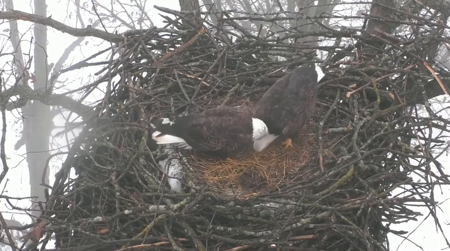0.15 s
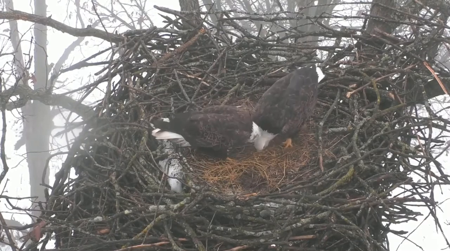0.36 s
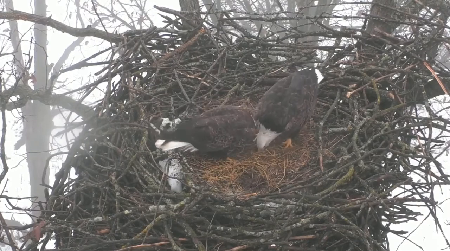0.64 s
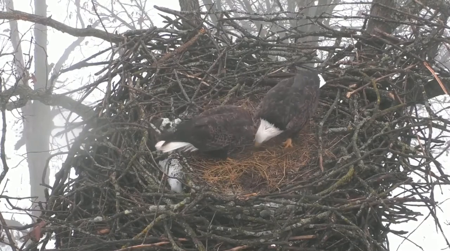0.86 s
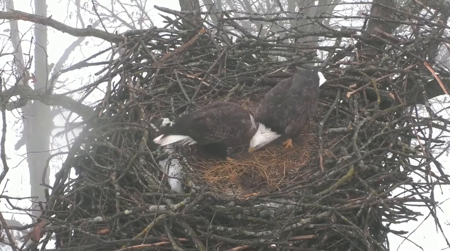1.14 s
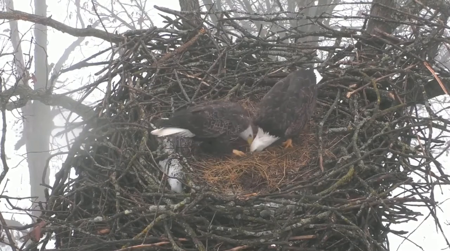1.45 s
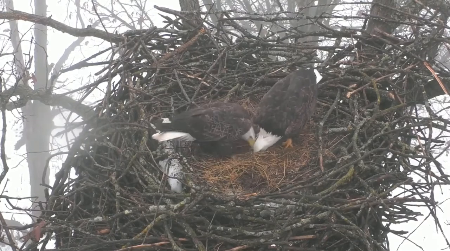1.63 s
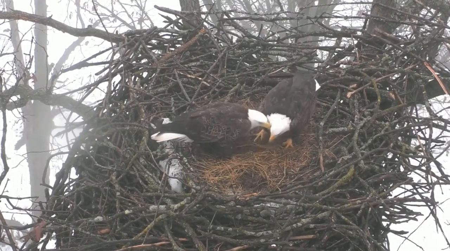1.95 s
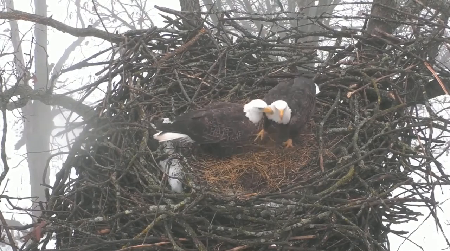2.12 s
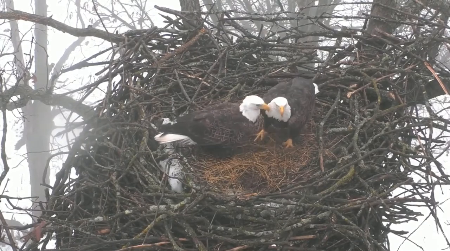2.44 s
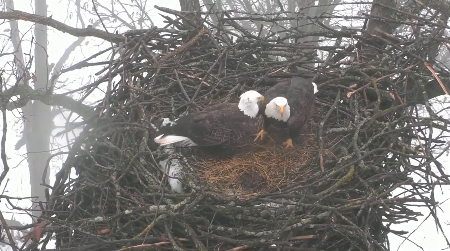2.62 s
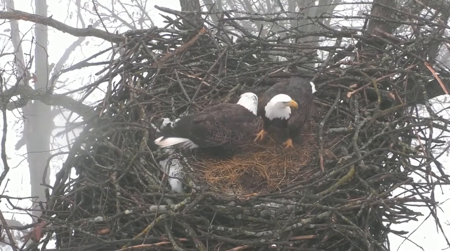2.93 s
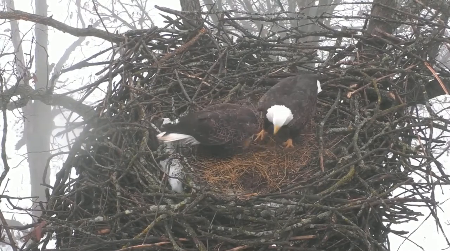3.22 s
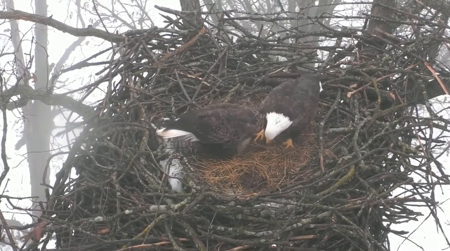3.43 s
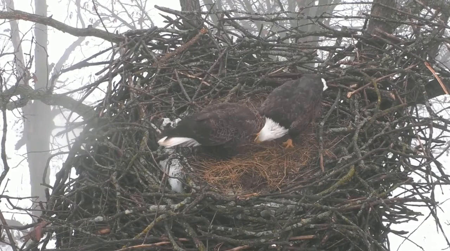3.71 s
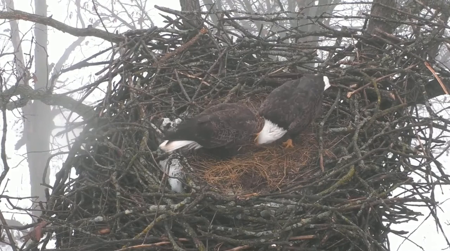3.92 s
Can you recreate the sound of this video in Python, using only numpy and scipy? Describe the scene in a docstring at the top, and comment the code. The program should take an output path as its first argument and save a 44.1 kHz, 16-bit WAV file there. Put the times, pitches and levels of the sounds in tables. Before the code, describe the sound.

A large bird of prey gives two hoarse rising notes, then a steady run of short raspy high chirps, echoing in windy bare woods.

```python
"""A bald eagle at its nest pipes two slow upward slurs, then a run of short, raspy, arching chirps.
Its notes are wavering sines with coloured noise as rasp, and they echo among bare trees.
Small birds whistle faintly at the start (gliding sines), and a distant bird gives one hoarse note near the end.
Wind rumbles on the microphone over the far hush of the woods (shaped noise),
and the nest camera's electronics add a thin high whine and a faint hiss."""
import sys
import numpy as np
from scipy import signal
from scipy.fft import rfft, irfft
from scipy.io import wavfile

SR = 44100
rng = np.random.default_rng(int(sys.argv[2]) if len(sys.argv) > 2 else 0)


def wrap_up_sound(samples):
    """Save the sound to the file named by the first command line argument, as 16-bit audio."""
    columns = np.atleast_2d(samples).T
    # keep every value between -1 and 1, then stretch to whole-number steps
    tamed = np.clip(columns, -1, 1)
    steps = np.round(tamed * 32767).astype(np.int16)
    wavfile.write(sys.argv[1], SR, steps)


N = 179531
T = np.arange(N) / SR  # time in seconds

# Noise colours, each only a shape, since the noise is levelled afterwards: pitch_hz, level_db
# the camera's hiss
HISS_COLOUR = [(1500, 2), (4100, 8.5), (5000, -1), (7000, 1.5), (11000, 5.5), (16000, -5.5)]
# the far hush of the woods: pitch_hz, level_db
WOODS_COLOUR = [(100, -6.5), (380, 2.5), (600, -4), (780, 0.5), (950, 4), (1200, -4.5), (1600, -11),
                (1900, -14), (2250, -5.5), (2700, -1.5), (3400, -8), (3900, -13.5), (4500, -39)]
# wind on the microphone: pitch_hz, level_db
RUMBLE_COLOUR = [(12, -11), (25, -3), (60, 0.5), (110, -1.5), (160, -8), (230, -15), (330, -22),
                 (600, -27.5), (1500, -56.5)]
# the rasp in the eagle's throat: pitch_hz, level_db
THROAT_COLOUR = [(1200, -12), (1800, -16.5), (2200, -6), (2700, -0.5), (3100, -2), (3450, 6), (3800, -3),
                 (4300, -11), (4700, -20.5), (5200, -31), (6200, -30), (8500, -44.5)]
# The wind's rise and fall, before a small overall lift: time_s, rumble_db
WIND_LEVELS = [(0.03, -49), (0.08, -47), (1.0, -49.5), (1.03, -43.5), (1.3, -48.5), (1.34, -42.5),
               (1.48, -48.5), (1.51, -41.5), (1.54, -48), (1.79, -48), (2.09, -53.5), (2.77, -49),
               (2.81, -56.5), (2.9, -45), (3.24, -42), (3.43, -50.5), (3.69, -47.5), (4.02, -51)]
# Small birds' whistles: start_s, length_s, start_pitch_hz, end_pitch_hz, level_db
BIRD_WHISTLES = [(.025, .1, 2560, 2470, -57), (.048, .022, 6800, 5950, -77), (.32, .085, 6450, 7300, -79),
                 (.11, .15, 4850, 4950, -84), (.16, .09, 4380, 4420, -81), (.15, .09, 5450, 5600, -87),
                 (.24, .03, 3300, 3150, -62), (.36, .018, 3200, 3100, -63), (.375, .04, 2180, 2060, -67)]
# The eagle's opening slurs: mid_climb_s, climb_s, lead_in_s, low_pitch_hz, top_pitch_hz, level_db (at the top)
EAGLE_SLURS = [(.477, 0.0217, 0.016, 2640, 3430, -55), (.672, 0.0293, 0.046, 2520, 3360, -55.5)]
# The eagle's chirps: crest_s, crest_pitch_hz, tone_db, rasp_db (before it clears at the crest),
# length_factor (times), echo_db (sent to the trees)
EAGLE_CHIRPS = [(0.888, 3240, -55.5, -62, 0.96, -51.5), (1.103, 3290, -58, -62, 0.9, -52),
                (1.305, 3304, -58.5, -61, 1.0, -50.5), (1.512, 3300, -52.5, -58.5, 1.02, -49),
                (1.719, 3313, -47.5, -54.5, 0.9, -52), (1.924, 3324, -46.5, -54, 1.0, -51),
                (2.122, 3424, -41, -47, 1.05, -61), (2.33, 3285, -51.5, -52, 1.1, -56),
                (2.538, 3345, -45, -53, 1.05, -56), (2.749, 3380, -46, -52, 1.24, -68),
                (2.952, 3370, -46, -51, 0.92, -66), (3.169, 3306, -44, -51, 0.94, -68)]

WOODS_DB, HISS_DB = -59.5, -75
WHINE_HZ, WHINE_DB = 10105, -53.7
CUTOFF_HZ = 15850

# A chirp climbs to its crest and drops off it; sags are shares of the crest pitch.
# The chirp's length factor stretches these times and the note's times below.
RISE_S, FALL_S, LEAD_SAG, END_SAG = 0.021, 0.0151, 0.17, 0.22
# The clear note is held around the crest, and is weaker away from it
NOTE_LEAD_S, NOTE_HOLD_S, FLANK_DB = 0.053, 0.0074, -14.5
NOTE_ATTACK_DB_PER_S, NOTE_RELEASE_DB_PER_S = 402, 1200
# The rasp grows as it goes, and clears while the note is at its top
RASP_LEAD_S, RASP_HOLD_S = 0.026, 0.042
RASP_ATTACK_DB_PER_S, RASP_RELEASE_DB_PER_S = 519.5, 750
RASP_GROWTH_DB_PER_S, RASP_CLEARS_DB = 12, -5
# A slur is softer while low, holds its top briefly, then fades; its rasp outlasts the note
SLUR_LOW_DB, SLUR_HOLD_S, SLUR_RASP_HOLD_S = -4.5, 0.02, 0.052
SLUR_ATTACK_DB_PER_S, SLUR_RELEASE_DB_PER_S = 300, 647


def from_db(db):
    """Turn decibels into a plain multiplier."""
    return 10 ** (np.asarray(db) / 20)


def rms_one(x):
    """Scale a signal so its average strength (rms) is 1."""
    return x / np.sqrt(np.mean(x ** 2) + 1e-20)


def noise(colour):
    """Random noise, shaped to a colour by filtering, with rms 1."""
    hz, db = np.transpose(colour)
    bins = np.maximum(np.fft.rfftfreq(N, 1 / SR), 1)
    gain = from_db(np.interp(np.log(bins), np.log(hz), db, left=-120, right=-120))
    return rms_one(irfft(rfft(rng.standard_normal(N)) * gain, N))


def drift(rate_hz):
    """A random wander, mostly slower than the given rate, with rms 1."""
    bins = np.fft.rfftfreq(N, 1 / SR)
    smoothing = 1 + (bins / rate_hz) ** 2
    return rms_one(irfft(rfft(rng.standard_normal(N)) / smoothing, N))


def tone(hz):
    """A sine of rms 1 that follows a pitch curve."""
    return np.sqrt(2) * np.sin(2 * np.pi * np.cumsum(hz) / SR)


def swell(age, lead_s, hold_s, attack_db_per_s, release_db_per_s):
    """A gain that climbs, is full from lead_s before age zero to hold_s after it, then fades."""
    too_early = np.maximum(-lead_s - age, 0)
    too_late = np.maximum(age - hold_s, 0)
    return from_db(-attack_db_per_s * too_early - release_db_per_s * too_late)


def scatter(x, delay_s, t60_s):
    """Many small reflections off trunks and branches start after a delay and fall 60 dB in t60_s."""
    age = T[:SR] - delay_s
    taps = rng.standard_normal(SR) * (age > 0) * from_db(-60 * np.abs(age) / t60_s)
    unit_energy = taps / np.sqrt(np.sum(taps ** 2))
    return signal.fftconvolve(x, unit_energy)[:N]


def electronics(wander_hz=52, shimmer=0.05):
    """A whine whose pitch trembles very fast, giving it a narrow noisy skirt, over a faint hiss."""
    pitch = WHINE_HZ + wander_hz * drift(1500)
    whine = from_db(WHINE_DB) * (1 + shimmer * drift(180)) * tone(pitch)
    return whine + from_db(HISS_DB) * noise(HISS_COLOUR)


def gusts(hush_share=0.1):
    """The wind's rumble in dB, and a gain by which the woods stir a little with it."""
    rumble_db = np.interp(T, *np.transpose(WIND_LEVELS))
    stir = from_db(hush_share * (rumble_db - rumble_db.mean()))
    return rumble_db, stir


def wind(lift_db=0.23):
    """Gusts buffet the microphone as low noise and lift the far hush of the woods a little."""
    rumble_db, stir = gusts()
    rumble = from_db(lift_db + rumble_db) * noise(RUMBLE_COLOUR)
    hush = from_db(WOODS_DB) * stir * noise(WOODS_COLOUR)
    return rumble + hush


def far_call(peak_s=3.55, width_s=0.017, pitch_hz=890, level_db=-61, jitter=0.059):
    """One short note from a distant bird, made hoarse by a fast random waver in pitch."""
    loudness = np.exp(-((T - peak_s) / width_s) ** 2)
    return from_db(level_db) * loudness * tone(pitch_hz * (1 + jitter * drift(205)))


def small_birds(jitter=0.011):
    """Thin whistles whose pitch glides as they swell and fade."""
    whistles = np.zeros(N)
    waver = 1 + jitter * drift(220)
    for start_s, length_s, start_hz, end_hz, level_db in BIRD_WHISTLES:
        progress = np.clip((T - start_s) / length_s, 0, 1)
        pitch = start_hz + (end_hz - start_hz) * progress
        whistles += from_db(level_db) * np.sin(np.pi * progress) * tone(pitch * waver)
    return whistles


def slurs(jitter=0.0386, flutter_db=2.5, rasp_db=-3.5):
    """Rising notes made hoarse by an unsteady pitch and level, with throat noise riding on them."""
    waver = 1 + jitter * drift(385)
    flutter = from_db(flutter_db * drift(210))
    fades = SLUR_ATTACK_DB_PER_S, SLUR_RELEASE_DB_PER_S
    note, hoarse = np.zeros(N), np.zeros(N)
    for mid_s, climb_s, lead_s, low_hz, top_hz, level_db in EAGLE_SLURS:
        age = T - mid_s
        height = (1 + np.tanh(2 * age / climb_s)) / 2  # 0 at the low pitch, 1 at the top
        pitch = low_hz + (top_hz - low_hz) * height
        level = from_db(level_db + SLUR_LOW_DB * (1 - height))
        voiced = swell(age, lead_s, SLUR_HOLD_S, *fades)
        note += level * voiced * flutter * tone(pitch * waver)
        hoarse += level * swell(age, lead_s, SLUR_RASP_HOLD_S, *fades)
    return note, from_db(rasp_db) * hoarse * noise(THROAT_COLOUR)


def arch(age):
    """Nearness to a chirp's flat-topped crest (0-1), and the pitch as a share of the crest's."""
    rising = age < 0
    height = np.exp(-np.abs(age / np.where(rising, RISE_S, FALL_S)) ** 3)
    pitch_share = 1 - np.where(rising, LEAD_SAG, END_SAG) * (1 - height)
    return height, pitch_share


def chirps(jitter=0.0161, flank_jitter=0.0703, flutter_db=2.5, crackle_db=2.0):
    """Each chirp arches up to a clear crest, rough on both flanks; also returns the sound sent to the trees."""
    wobble = drift(365)
    flutter = from_db(flutter_db * drift(150))
    breakup = rms_one(noise(THROAT_COLOUR) * from_db(crackle_db * drift(160)))
    voice, thrown = np.zeros(N), np.zeros(N)
    for crest_s, crest_hz, tone_db, rasp_db, length_factor, echo_db in EAGLE_CHIRPS:
        near = np.abs(T - crest_s) < 0.2  # only work close to this chirp
        age = T[near] - crest_s
        stretched_age = age / length_factor
        height, pitch_share = arch(stretched_age)

        # the syrinx (a bird's voice organ) is steadiest and loudest at the crest
        unsteady = jitter + flank_jitter * (1 - height)
        pitch = crest_hz * pitch_share * (1 + unsteady * wobble[near])
        voiced = swell(stretched_age, NOTE_LEAD_S, NOTE_HOLD_S, NOTE_ATTACK_DB_PER_S, NOTE_RELEASE_DB_PER_S)
        note = from_db(FLANK_DB * (1 - height)) * voiced * flutter[near] * tone(pitch)

        hoarse = swell(age, RASP_LEAD_S, RASP_HOLD_S, RASP_ATTACK_DB_PER_S, RASP_RELEASE_DB_PER_S)
        rasp_change_db = RASP_GROWTH_DB_PER_S * age + RASP_CLEARS_DB * height
        rasp = hoarse * from_db(rasp_change_db) * breakup[near]

        voice[near] += from_db(tone_db) * note + from_db(rasp_db) * rasp
        # with the head down in the nest, the echo rivals the direct sound
        thrown[near] += from_db(echo_db) * note
    return voice, thrown


def eagle(slur_echo_db=2.5, echo_delay_s=0.056, echo_low_hz=3000, blur=1.0):
    """The whole run of notes; trees throw back mainly their high crests, blurred and wavering."""
    slur, slur_rasp = slurs()
    voice, thrown = chirps()
    high_pass = signal.butter(4, echo_low_hz, "high", fs=SR, output="sos")
    crests = signal.sosfilt(high_pass, thrown + from_db(slur_echo_db) * slur)
    echo = scatter(crests, echo_delay_s, t60_s=0.16)
    waver = (1 + blur * drift(200)) / np.hypot(1, blur)  # divided to keep the average strength
    return slur + slur_rasp + voice + echo * waver


def scene(near_trees_db=-8, forest_db=-16):
    """Birds echo among near and far trees, with wind and the camera's own noise."""
    calls = far_call() + small_birds() + eagle()
    near_trees = from_db(near_trees_db) * scatter(calls, delay_s=0.02, t60_s=0.2)
    forest = from_db(forest_db) * scatter(calls, delay_s=0.069, t60_s=1.0)
    mix = electronics() + wind() + calls + near_trees + forest
    return mix[None]  # one channel


def record(dry, hollow_hz=1920, hollow_width_hz=170, hollow_db=-9):
    """The microphone has a narrow hollow in the midrange; the top is cut steeply."""
    bins = np.fft.rfftfreq(N, 1 / SR)
    distance = (bins - hollow_hz) / hollow_width_hz
    hollow = from_db(hollow_db * np.exp(-distance ** 4))
    coloured = irfft(rfft(dry) * hollow, N)
    steep_cut = signal.ellip(12, 0.1, 80, CUTOFF_HZ, fs=SR, output="sos")
    return signal.sosfilt(steep_cut, coloured)


dry = scene()
out = record(dry)
wrap_up_sound(out)
```